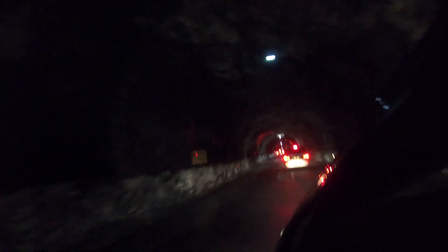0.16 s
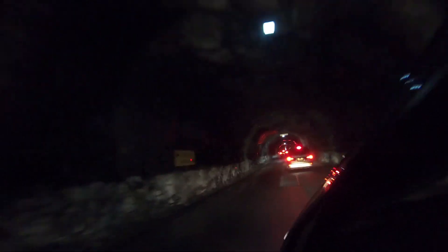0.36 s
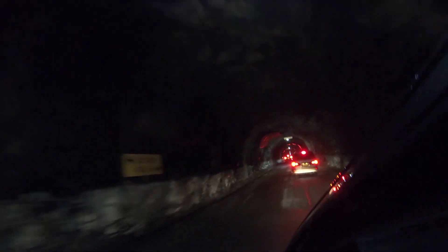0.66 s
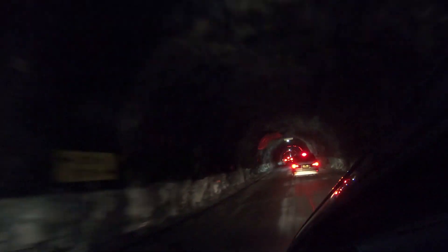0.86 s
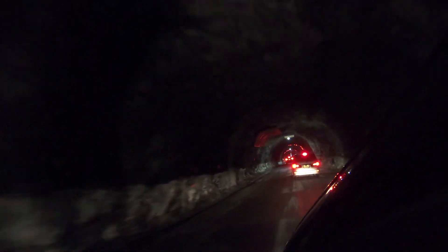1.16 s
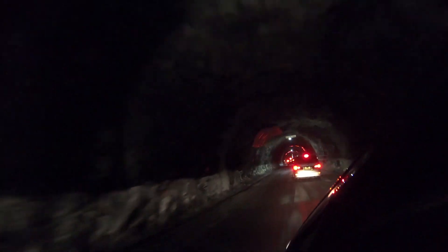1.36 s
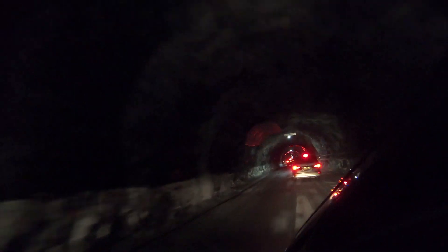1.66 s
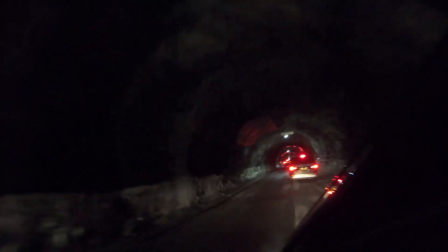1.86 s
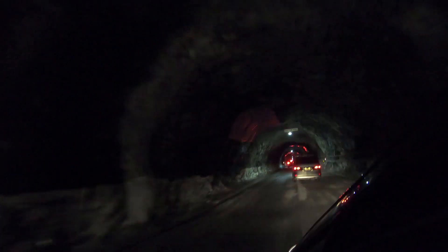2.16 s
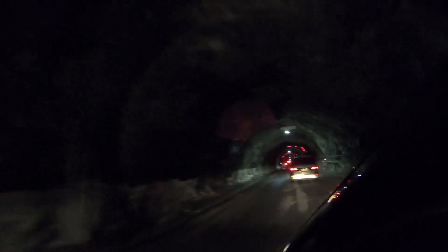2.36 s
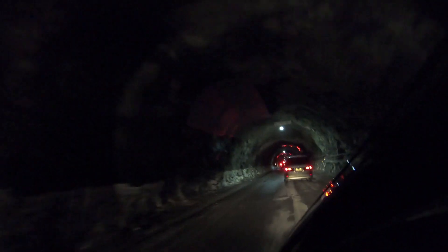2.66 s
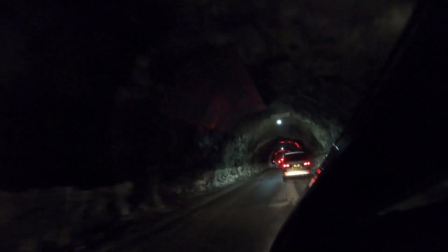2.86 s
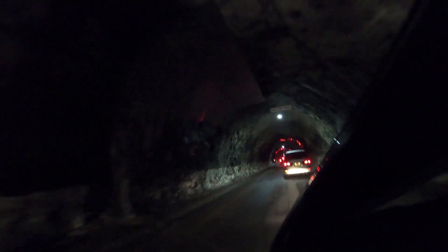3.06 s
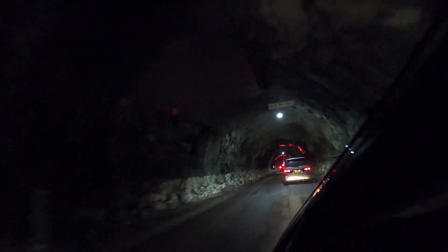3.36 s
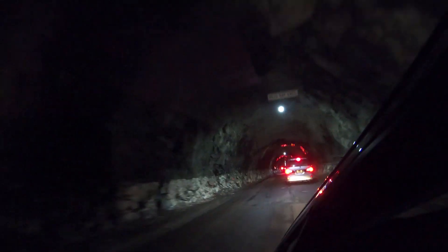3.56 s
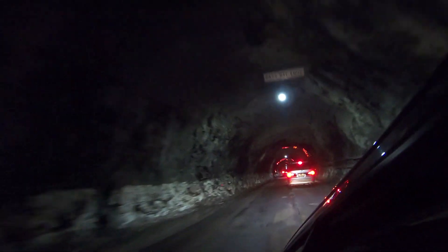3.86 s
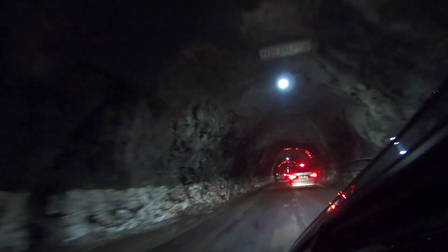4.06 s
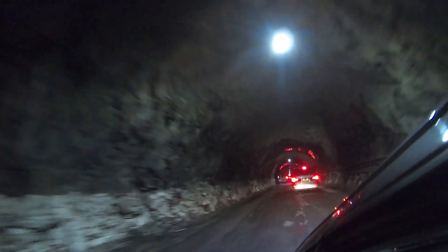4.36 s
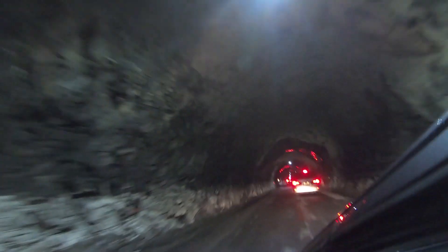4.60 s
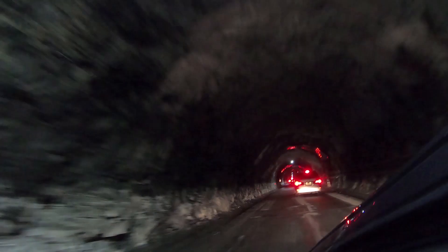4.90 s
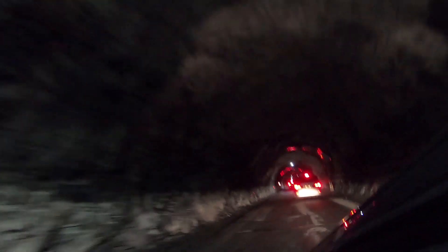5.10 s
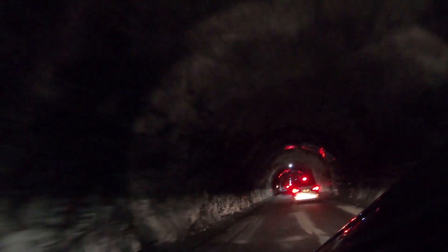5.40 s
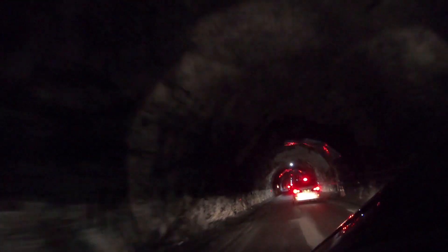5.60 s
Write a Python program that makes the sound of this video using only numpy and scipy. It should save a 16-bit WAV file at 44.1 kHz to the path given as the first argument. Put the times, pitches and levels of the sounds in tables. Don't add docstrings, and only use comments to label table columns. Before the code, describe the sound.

Heavy low wind buffeting batters a microphone outside a moving car in a wet rock tunnel, with tyre roar and faint brake squeal behind.

```python
import sys
import numpy as np
from scipy import signal
from scipy.fft import rfft, irfft
from scipy.io import wavfile
from scipy.ndimage import uniform_filter1d

SR = 44100
rng = np.random.default_rng(int(sys.argv[2]) if len(sys.argv) > 2 else 0)


def voltage_ratio(level):
    return 10 ** (np.asarray(level, float) / 20)


def log_audio(samples):
    frames = np.atleast_2d(samples).T
    limited = np.clip(frames, -1, 1)
    pcm = np.round(limited * 32767).astype(np.int16)
    wavfile.write(sys.argv[1], SR, pcm)


N = 253134
HZ = np.maximum(np.fft.rfftfreq(N, 1 / SR), 1)

# f/Hz, level/dB
HEAVE_SPECTRUM = [(9, -40), (16, -5), (30, -0.5), (60, 0), (90, -6), (140, -26.5), (300, -58), (1500, -140)]


def rms_one(x):
    return x / np.sqrt(np.mean(x ** 2) + 1e-20)


def in_time(rows):
    s, *columns = np.transpose(rows)
    return [np.interp(np.arange(N) / SR, s, c) for c in columns]


def over_hz(points):
    hz, *columns = np.transpose(points)
    return [np.interp(np.log(HZ), np.log(hz), c) for c in columns]


def humps(times, heights, halves):
    t = np.arange(0, N + 64, 64) / SR
    since = t - np.array(times)[:, None]
    rows = np.array(heights)[:, None] * np.exp(-(since / np.array(halves)[:, None]) ** 2)
    return np.interp(np.arange(N) / SR, t, rows.sum(axis=0))


def shaped(x, gain):
    return irfft(rfft(x) * gain, N)


def drift(rate):
    return rms_one(shaped(rng.standard_normal(N), (HZ > 1) / (1 + (HZ / rate) ** 2)))


def step(hz, order):
    above = 1 / (1 + (hz / HZ) ** order)
    return np.sqrt(1 - above), np.sqrt(above)


def grit():
    # t/s, peak level/dB
    stones = [
        (0.5197, -38),
        (1.6494, -45.5),
        (2.1994, -55),
        (3.1294, -55),
        (4.1235, -57),
        (4.7294, -48),
        (5.1552, -50),
        (5.2394, -45),
        (5.516, -48.5),
        (5.5994, -52),
    ]
    clicks = np.zeros(N)
    clicks[[round(s * SR) for s, db in stones]] = voltage_ratio(np.array(stones)[:, 1] + 1.5)
    t = np.arange(2000) / SR
    decay = np.exp(-t / .0005) + .12 * np.exp(-t / .015)
    crack = rng.standard_normal((2, len(t))) * decay
    panel = signal.butter(2, [4000, 13500], "band", fs=SR, output="sos")
    struck = signal.fftconvolve(clicks[None], crack)[:, :N]
    return signal.sosfilt(panel, struck) * voltage_ratio(np.array([[-4.5], [0.1]]))


def brakes():
    # t/s, peak level/dB, half length/s
    rubs = [(.04, -52, .08), (.33, -52, .06), (.44, -49, .08), (.73, -51, .05), (1.02, -49, .08),
            (1.17, -48, .09), (1.35, -48, .09), (1.47, -51, .08), (1.61, -49, .08), (1.93, -53, .05),
            (2.1, -52, .08), (2.26, -53, .06), (2.43, -56, .08), (2.64, -49, .07), (2.81, -54, .1),
            (3.37, -45, .07), (3.58, -45, .03), (3.63, -45, .03), (3.81, -45, .12), (4.08, -50, .03),
            (4.16, -44, .04), (4.22, -47, .04), (4.3, -50, .08), (4.49, -49, .03), (4.59, -44, .06),
            (4.84, -44, .05), (4.935, -45, .035), (5.08, -48, .11), (5.27, -52, .07), (5.68, -51, .07)]
    # f/Hz, width/Hz, level/dB
    weak_modes = [
        (1563, 8, -54),
        (2990, 40, -53),
        (3740, 14, -69),
        (6000, 30, -75),
    ]
    pitch_hz = 3146 + 8 * drift(12)
    s, peak_db, half_s = np.transpose(rubs)
    rub = voltage_ratio(-60) + humps(s, voltage_ratio(peak_db), .7 * half_s)
    unevenness = voltage_ratio(5.5 + 1.8 * drift(24))
    squeal = rub * unevenness * np.sin(2 * np.pi * np.cumsum(pitch_hz) / SR)
    for hz, width_hz, level_db in weak_modes:
        resonance = 1 / (1 + ((HZ - hz) / width_hz) ** 2)
        ringing = rms_one(shaped(rng.standard_normal(N), resonance))
        squeal += voltage_ratio(level_db + 3.8 * drift(3.3)) * ringing

    since = np.arange(N) / SR - 3.545
    rise_s, fall_s = .065, .085
    slip = np.exp(-(since / np.where(since < 0, rise_s, fall_s)) ** 4)
    start_hz, sag_hz_per_s = 7920, 2500
    carrier = np.cos(2 * np.pi * (start_hz - sag_hz_per_s * since / 2) * since)
    squeak = voltage_ratio(-53.5) * slip * np.sqrt(2) * carrier * drift(200)
    return squeal * [[-voltage_ratio(-16.5)], [1]] + squeak * [[-voltage_ratio(-9.5)], [1]]


def at_ports(direct, diffuse, gain):
    # f/Hz, left minus right level/dB, coherence 0-1
    shading = [(340, -1.5, 0.99), (601, 2.5, 0.97), (803, -8.5, 0.5), (1060, -10.5, 0.2), (1160, -11, 1),
               (1490, -7.5, 0.74), (2150, -4, 0.78), (2670, -12, 0.7), (2840, -11.5, 0), (3560, -4.5, 0.38),
               (4450, -4, 0.74), (6300, -7, 0.2), (8300, 2.4, 0.7), (10900, -3.5, 0.2), (12600, -4.5, .3)]
    # f/Hz, lag/rad
    phase_lag = [(350, 0), (600, .6), (900, 1.4), (1050, -.9), (1500, -.4), (2300, .45), (2800, .3),
                 (3200, -1.2), (4000, -.4), (5000, 2.3), (6000, 2.3), (7000, 1.7), (8500, 3.1),
                 (10500, 3.6), (11500, 6.2)]
    (left_db, alike), (lag,) = over_hz(shading), over_hz(phase_lag)
    alike = np.clip(alike, 0, .99)
    left = shaped(direct, gain * voltage_ratio(left_db) * alike * np.exp(-1j * lag))
    left += shaped(diffuse, gain * voltage_ratio(left_db) * np.sqrt(1 - alike ** 2))
    pair = np.array([left, shaped(direct, gain)])
    return pair / np.sqrt(np.mean(pair.mean(axis=0) ** 2))


def droplets(per_s, spread_db):
    sizes = voltage_ratio(spread_db * np.minimum(rng.exponential(1, (2, N)), 5))
    sizes *= rng.random((2, N)) < per_s / SR
    return rng.standard_normal((2, N)) * (1 + sizes)


def tyres():
    # t/s, level/dB
    rock = [(0.0, -35.5), (0.01, -32.5), (0.3, -34), (0.4, -31), (0.89, -32), (1.19, -30.5), (2.81, -32),
            (3.48, -29), (3.75, -30.5), (5.44, -30), (5.7, -30)]
    # t/s, level/dB
    wetness = [(0.0, -57), (0.51, -55), (0.52, -52.5), (0.87, -55), (1.48, -55), (1.49, -56.5), (2.82, -55),
               (3.52, -58.5), (3.95, -57.5), (4.19, -60.5), (4.84, -59.5), (5.11, -59.5), (5.19, -56),
               (5.43, -60.5), (5.51, -57.5), (5.7, -58.5)]
    # f/Hz, level/dB
    roar_spectrum = [(300, -15.5), (450, -11), (650, -7.5), (800, -2.35), (1050, -3.5), (1200, -6.5),
                     (1400, -5), (1750, -12.5), (2000, -8.5), (2300, -10), (2800, -15), (3300, -17),
                     (3800, -24.5), (4300, -23)]
    # f/Hz, level/dB
    spray_spectrum = [(3000, 5.5), (3700, 5), (4300, -2.5), (5000, -0.5), (6000, -4), (7000, -5.5),
                      (7800, -9.5), (8600, -15), (9500, -13.5), (10300, -14), (11000, -19.5), (12500, -27),
                      (14000, -31.5), (15000, -40.5)]
    (roar_db,), (spray_db,) = in_time(rock), in_time(wetness)
    upper_db = -39.5 + 0.36 * (roar_db - roar_db.mean())
    mist_db = -73.5 + 1.4 * (spray_db - spray_db.mean())
    below_spray, above_roar = step(3560, order=16)

    body, upper = step(1450, order=12)
    roar_gain = voltage_ratio(over_hz(roar_spectrum)[0]) * below_spray * step(220, order=6)[1]
    noise = rng.standard_normal((4, N))
    roar = voltage_ratio(roar_db + 1.02 + 0.23 * drift(9.8)) * at_ports(noise[0], noise[1], roar_gain * body)
    roar += voltage_ratio(upper_db + 2.5 + 0.53 * drift(3.9)) * at_ports(noise[2], noise[3], roar_gain * upper)

    coarse, fine = step(8250, order=16)
    spray_gain = voltage_ratio(over_hz(spray_spectrum)[0]) * above_roar
    spray = voltage_ratio(spray_db + 3.0 + 0.66 * drift(13)) * at_ports(*droplets(250, 1.5), spray_gain * coarse)
    mist_gain = spray_gain * fine * step(14250, order=80)[0]
    mist = voltage_ratio(mist_db + 3.0 + 1.2 * drift(12)) * at_ports(*droplets(300, 3.5), mist_gain)
    return roar + spray + mist


def slaps():
    # t/s, peak level/dB, centre f/Hz, left minus right level/dB
    eddies = [(0.427, -5, 165, -2), (0.552, -16, 108, -6), (0.699, -12, 135, -6), (0.839, -19, 164, 2),
              (1.133, -11, 128, 2), (1.516, -11, 121, 0.0), (1.831, -9.5, 181, -6), (1.888, -20, 163, 1.0),
              (2.564, -13.5, 137, 1), (2.959, -13, 156, -10), (3.406, -9.5, 129, -1),
              (3.451, -14, 126, -5.5), (4.03, -9, 234, -4.5), (4.085, -8.5, 229, 0), (4.168, -18, 151, 6),
              (4.256, -14, 140, 0), (4.474, -15, 170, -1), (4.973, -9.5, 140, -7), (5.547, -11.5, 159, -6)]
    out, t = np.zeros((2, N + 2000)), np.arange(2000) / SR
    for s, peak_db, hz, pan_db in eddies:
        cycles = t * hz
        hump = cycles * np.exp(1 - cycles / 0.86) / 0.97
        push = hump * np.sin(2 * np.pi * cycles)
        at = round(s * SR)
        out[:, at:at + len(t)] += push * voltage_ratio(peak_db - 4.0 + np.array([[pan_db / 2], [-pan_db / 2]]))
    return out[:, :N]


def air():
    # t/s, level/dB
    airstream = [(0.0, -20.5), (0.65, -15.5), (0.98, -19.5), (1.06, -21.5), (1.33, -17.5), (1.38, -18.5),
                 (2.08, -16.5), (2.16, -17), (2.2, -17), (2.95, -18), (3.08, -22), (3.22, -15), (3.25, -23),
                 (3.41, -13), (3.43, -18.5), (5.7, -17.5)]
    # t/s, strength/dB, break-up/dB, half length/s
    gusts = [(0.187, 2.5, 0.5, 0.097), (0.28, -3.5, -4, 0.026), (0.394, 1.5, 1, 0.22),
             (1.08, -3, 4.5, 0.044), (1.133, -1.5, 11, 0.024), (1.18, 0.5, -6, 0.024),
             (1.245, -2, 0, 0.043), (1.316, 3.5, -1.5, 0.03), (1.613, -2, 1, 0.034), (1.656, 5, 2.5, 0.044),
             (1.732, -5, 1.5, 0.096), (1.998, 1.5, 2, 0.042), (2.166, -9, 4.5, 0.024),
             (2.213, 1.5, 1.5, .04), (2.329, 2.5, 6, 0.028), (2.529, -3.5, -4, 0.016),
             (3.11, -1.5, -0.5, 0.11), (3.209, 1, 5, 0.029), (3.27, -1, -2, 0.03), (3.396, 0, 6, 0.025),
             (3.52, -1, 10, 0.038), (4.007, -4.5, -2.5, 0.023), (4.09, 5, 1.5, 0.01),
             (4.475, 0.5, 11, 0.042), (4.525, -1.5, -4, 0.036), (4.925, 0.5, -2, 0.036),
             (4.99, 1.5, 1.5, 0.023), (5.258, 2, 4, .06), (5.452, 0.5, 3, .04), (5.57, -1, 6, .05)]
    s, strength_db, breakup_db, half_s = np.transpose(gusts)
    return in_time(airstream)[0], humps(s, strength_db, half_s), humps(s, breakup_db, half_s)


def gusty(spectrum, level_db, lumps_db, rate, even_s):
    noise = shaped(rng.standard_normal(N), voltage_ratio(over_hz(spectrum)[0]))
    span = int(even_s * SR)
    noise /= np.sqrt(uniform_filter1d(uniform_filter1d(noise ** 2, span), span))
    return voltage_ratio(level_db) * rms_one(noise * voltage_ratio(lumps_db * drift(rate)))


def wind():
    # f/Hz, level/dB
    port_spectrum = [(40, -21), (75, -1), (110, -5), (200, -6), (350, -14), (550, -16), (900, -31),
                     (4000, -130)]
    stream_db, gust_db, breakup_db = air()
    heave_db = stream_db + gust_db - 13
    flutter_db = stream_db + 2.9 * gust_db + .9 * breakup_db - 16.5
    apart = gusty(HEAVE_SPECTRUM, heave_db, 2.5, 6, .06)
    apart += gusty(port_spectrum, flutter_db, 2.8, 14, 0.037)
    return apart * [[1], [-1]]


def buffeting():
    # f/Hz, level/dB
    thud_spectrum = [(50, -12), (80, -10), (110, 0.5), (140, -4), (180, -10), (300, -44), (1500, -140)]
    # f/Hz, level/dB
    flutter_spectrum = [(90, -29.5), (150, -7), (190, -0.5), (250, -2), (420, -11.5), (650, -17.5),
                        (1100, -33), (3000, -130)]
    stream_db, gust_db, breakup_db = air()
    level_db = stream_db + gust_db
    heave_db = stream_db + 0.78 * gust_db - 0.85 * breakup_db - 1.5
    heave = gusty(HEAVE_SPECTRUM, heave_db, .5, 12.0, 0.066)
    thud = gusty(thud_spectrum, level_db + 0.55 * breakup_db - 6.5, 2.83, 22, 0.063)
    flutter = gusty(flutter_spectrum, level_db + 0.68 * breakup_db - 9.5, 2.3, 43, 0.043)
    return (heave + thud + flutter) * voltage_ratio(np.array([[-.45], [.45]]))


def scene():
    return grit() + brakes() + tyres() + slaps() + wind() + buffeting()


def top_cut(x):
    return signal.sosfilt(signal.butter(12, 15700, fs=SR, output="sos"), x)


def record(dry):
    limited = 0.95 * np.tanh(dry / 0.88)
    return top_cut(limited)


dry = scene()
out = record(dry)
log_audio(out)
```